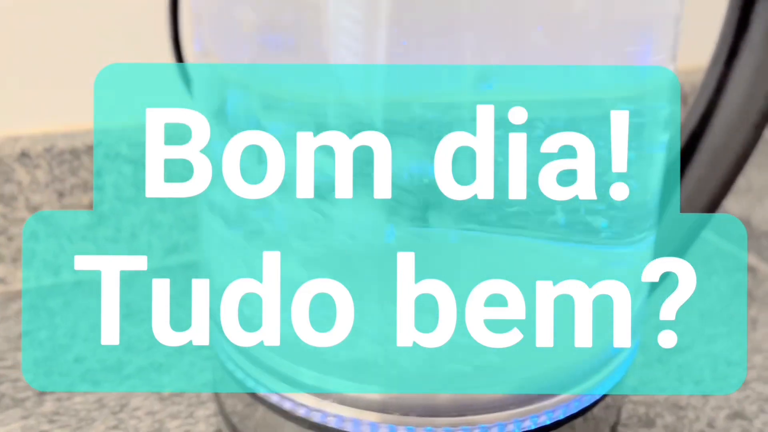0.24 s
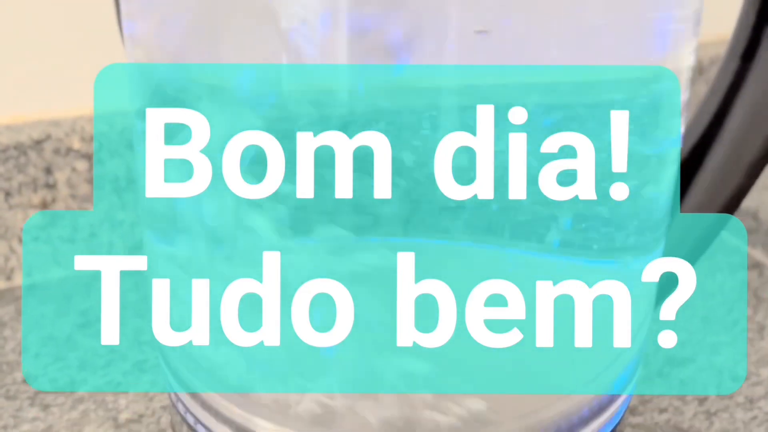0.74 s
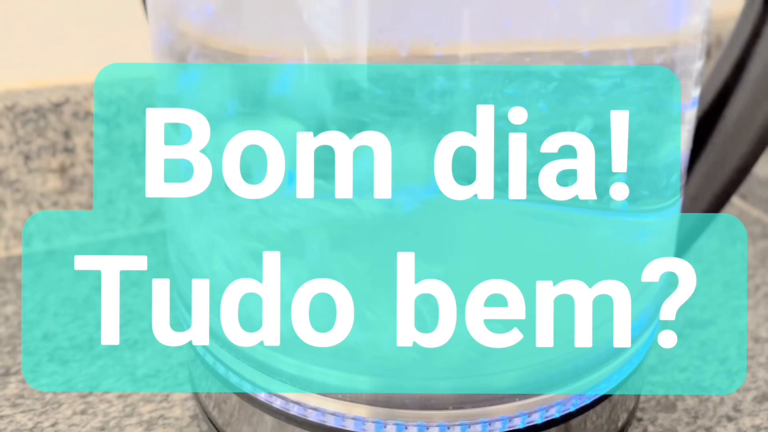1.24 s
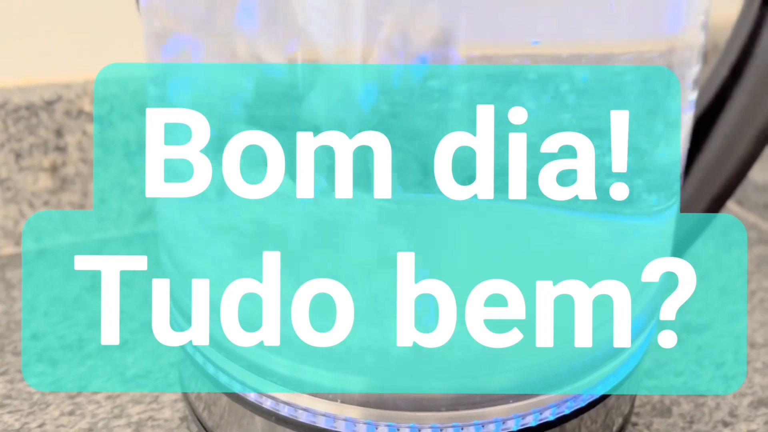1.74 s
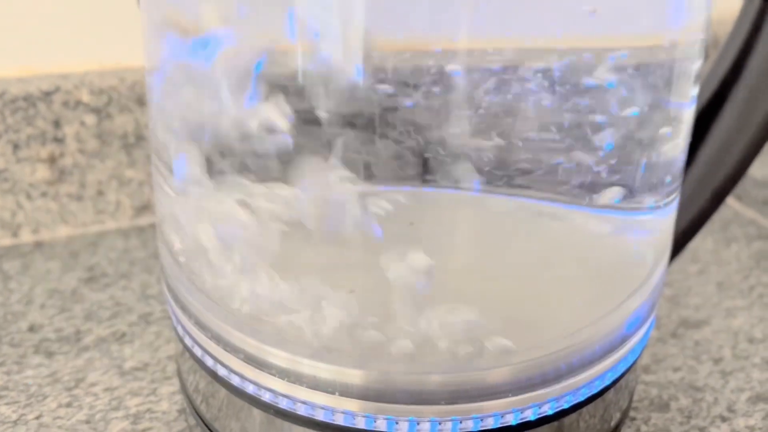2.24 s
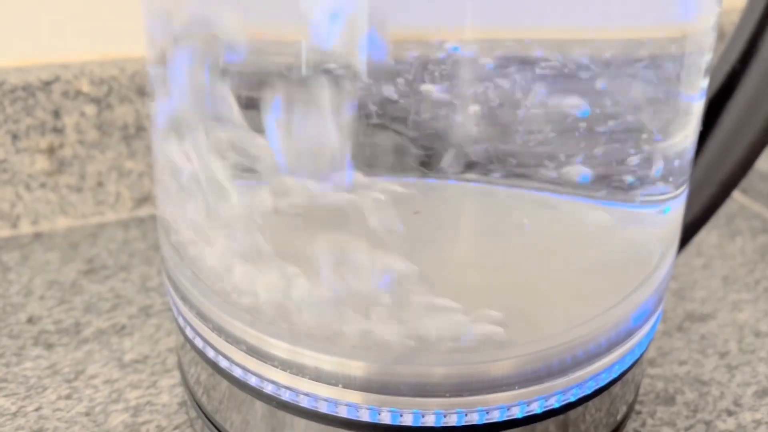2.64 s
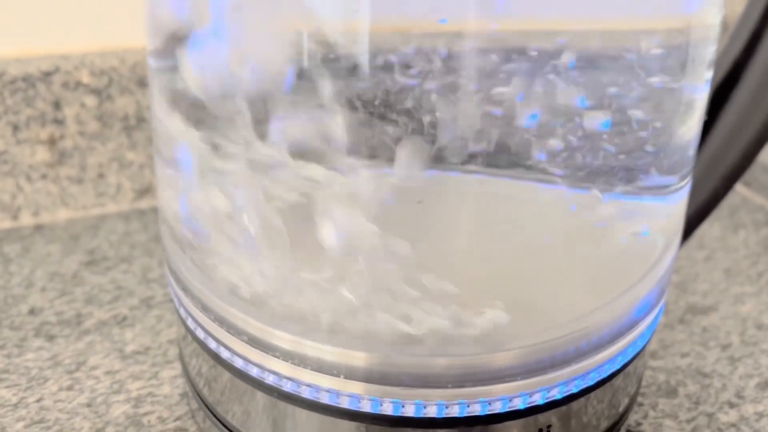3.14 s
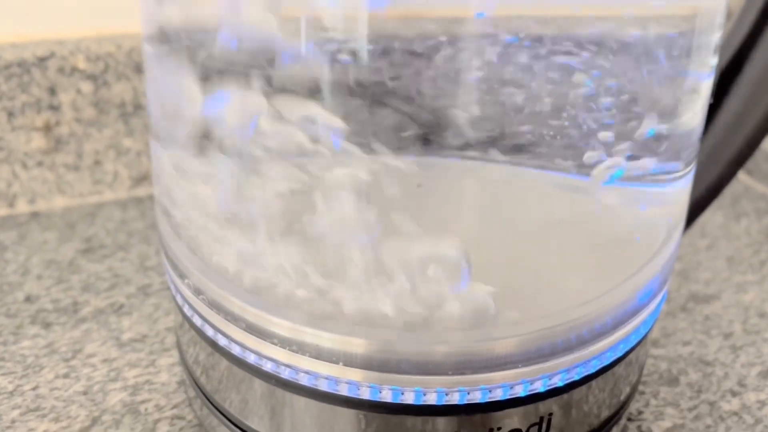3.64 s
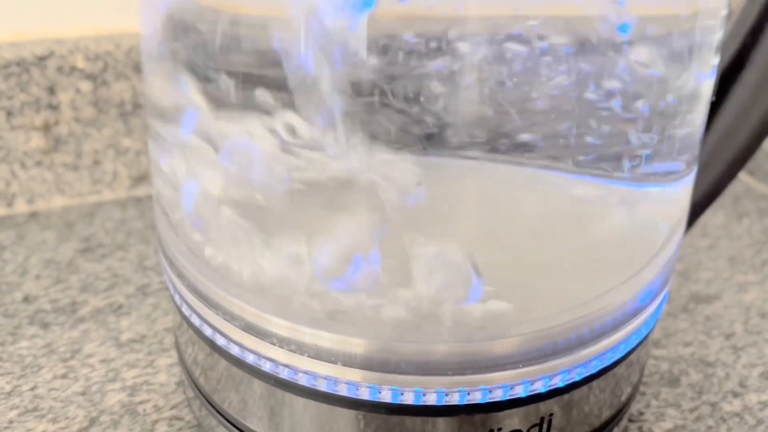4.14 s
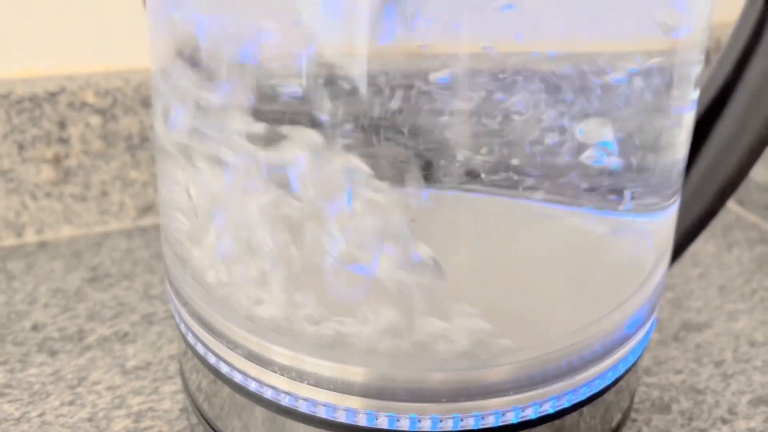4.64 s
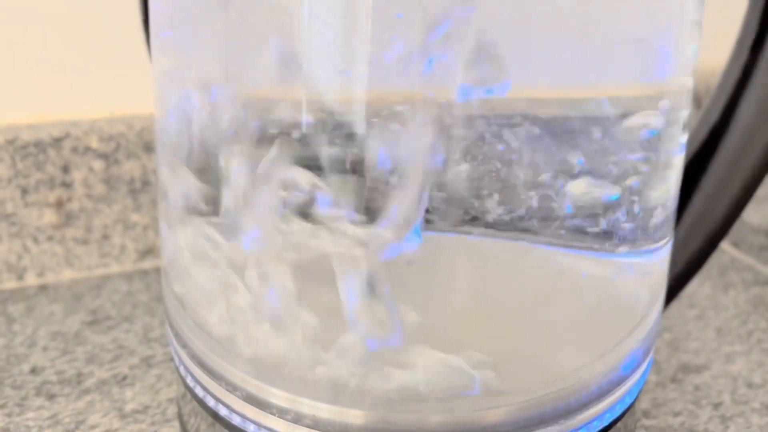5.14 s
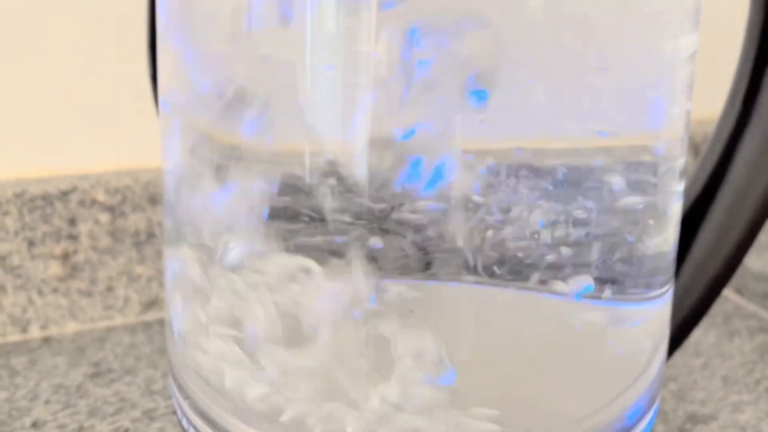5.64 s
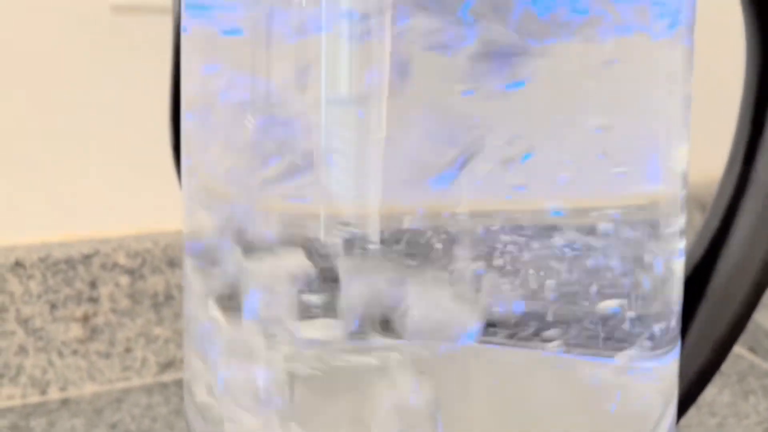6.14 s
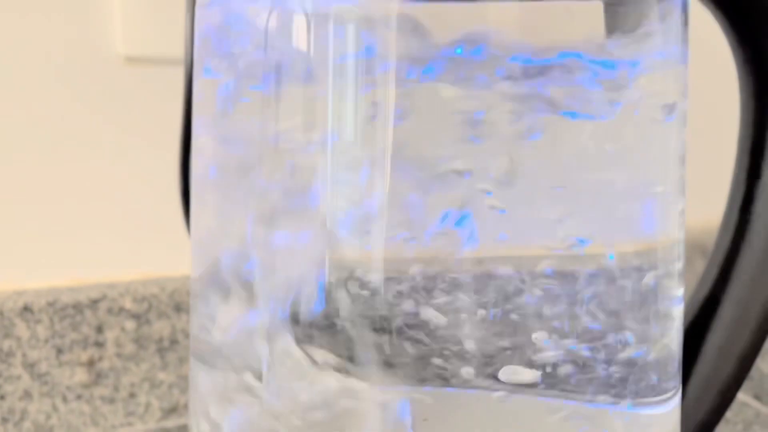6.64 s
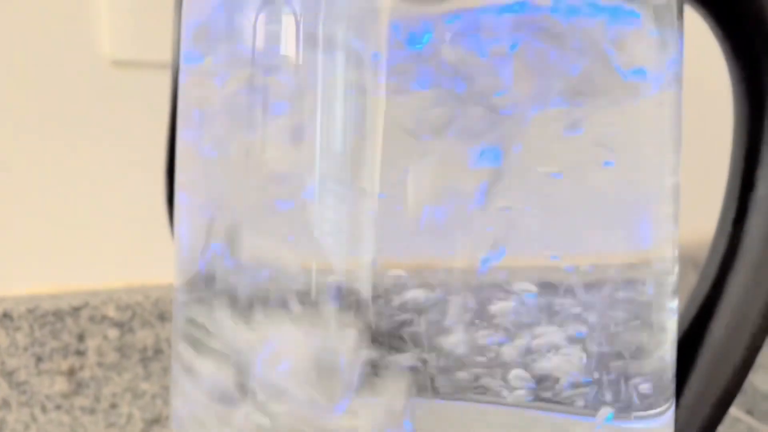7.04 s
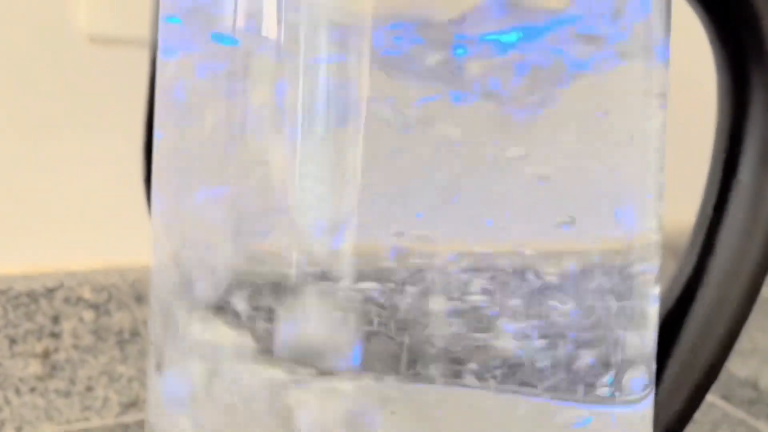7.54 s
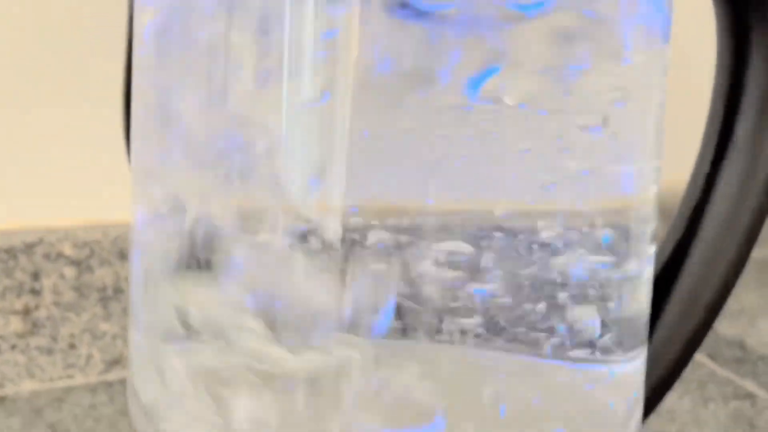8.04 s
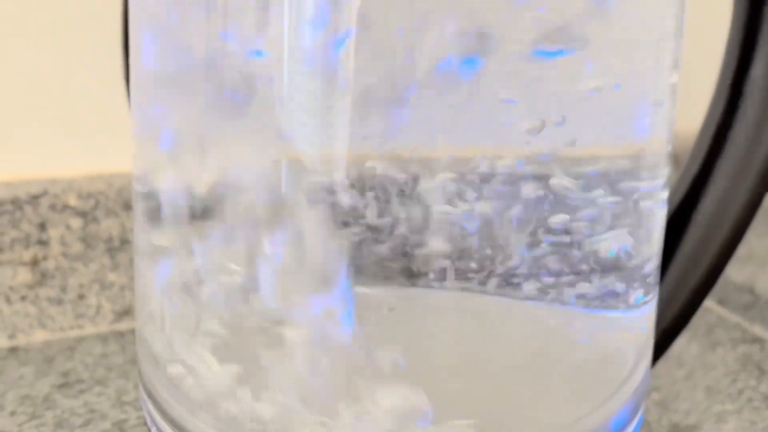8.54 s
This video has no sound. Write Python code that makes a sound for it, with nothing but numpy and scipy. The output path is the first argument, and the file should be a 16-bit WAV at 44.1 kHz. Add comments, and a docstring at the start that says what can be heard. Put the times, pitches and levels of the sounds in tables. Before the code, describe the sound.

Continuous rolling boil in a glass jug, heard close in stereo in a kitchen. Dense bubble collapses make a resonant rumble and soft hiss; irregular larger bubbles gulp over them. Little drops pop and tick, more often later, as spray falls back in short gusts. The bass eases a little and the top becomes splashier. Hard walls give a diffuse spread, with a barely audible high appliance whine behind.

```python
"""Glass kettle at a rolling boil

A glass kettle boils on a stone worktop, heard close by a mid-side pair of microphones.
Steam bubbles collapse on the heating plate: clumped clicks drive the jug's resonances as roar and fizz.
A low boom is narrow-band noise whose level beats by chance, its stronger moments placed by a table as a
tone of wandering pitch. Bubbles gulp as short rising sines, droplets pop as plinks with noisy edges, and
spray falls back as noise bursts. The walls return a blurred share of the collapses at the sides, and a
faint motor whine of steady sines comes from elsewhere in the kitchen."""
import sys
import numpy as np
from scipy import signal
from scipy.fft import rfft, irfft, next_fast_len
from scipy.io import wavfile

SR = 44100
rng = np.random.default_rng(int(sys.argv[2]) if len(sys.argv) > 2 else 0)


def master(y):
    """Save y as 16-bit WAV."""
    cut = np.clip(np.atleast_2d(y).T, -1, 1)
    pcm = np.round(cut * 32767)  # scale
    wavfile.write(sys.argv[1], SR, pcm.astype(np.int16))


N = 387631   # length in samples
SIZE = next_fast_len(N + SR // 2)   # transform length, with room for filter tails
HZ = np.maximum(np.arange(SIZE // 2 + 1) * SR / SIZE, 1)   # frequency of every bin


def from_db(db):
    """Gain of a level in dB."""
    return 10 ** (np.asarray(db) / 20)


def rms_one(x):
    """Scale to rms 1."""
    return x / np.sqrt(np.mean(x ** 2) + 1e-20)


def add(out, start_s, sound):
    """Mix a short sound in at a given time."""
    i = round(start_s * SR)
    out[i:i + len(sound)] += sound[:N - i]


def drift(rate):
    """Slow random curve with spread 1, changing about rate times a second."""
    step = 40   # samples between the points of the curve
    pole = np.exp(-2 * np.pi * rate * step / SR)
    noise = rng.standard_normal(N // step + 2002)
    slow = signal.lfilter([1], [1, -2 * pole, pole * pole], noise)[2000:]   # skip the settling
    return np.interp(np.arange(N) / step, np.arange(len(slow)), rms_one(slow))


def trend(start_db, db_per_s):
    """A level in dB that moves steadily."""
    return start_db + db_per_s * np.arange(N) / SR


def bump(centre_s, half_s):
    """A bell of height 1 around a given time."""
    return np.exp(-.5 * ((np.arange(N) / SR - centre_s) / half_s) ** 2)


def over_hz(points):
    """A spectrum table read at every bin, straight between points on a log frequency axis."""
    hz, value = np.transpose(points)
    return np.interp(np.log(HZ), np.log(hz), value)


def rises(modes):
    """Bell-shaped lift (or dip) in dB around each resonance."""
    return sum(db / (1 + (2 * (HZ - hz) / width) ** 2) for hz, width, db in modes)


def colour(x, gain_db):
    """Causal (minimum-phase) filter with the given dB at every bin."""
    cepstrum = irfft(gain_db * np.log(10) / 20, SIZE)
    # folding the cepstrum forward in time makes the response causal
    cepstrum[1:SIZE // 2] *= 2
    cepstrum[SIZE // 2 + 1:] = 0
    return irfft(rfft(x, SIZE) * np.exp(rfft(cepstrum)), SIZE)[..., :N]


def bandpass(x, order, low_hz, high_hz):
    """Butterworth band."""
    return signal.sosfilt(signal.butter(order, [low_hz, high_hz], "band", fs=SR, output="sos"), x)


def collapses(per_s, spread_db, clump_db, hiss_db):
    """Random clicks of uneven size that come in clumps, over the blur of countless small ones."""
    signs = rng.choice([-1, 1], N)
    sizes = from_db(spread_db * np.minimum(rng.exponential(1, N), 3.5)) * signs
    born = rng.random(N) < per_s / SR
    clump = from_db(clump_db * (drift(9.2) + drift(41)))
    clicks = rms_one(sizes * born * clump)
    return rms_one(clicks + from_db(hiss_db) * rng.standard_normal(N))


# Resonances of jug, water and lid: centre_hz, width_hz, rise_db
JUG_MODES = [(104.3, 13, 6.5), (200, 28, 7), (247.4, 16.4, 7.5), (339.6, 24, 7), (557, 42.4, 7.5),
             (693, 84, 7), (904, 23, 3.5), (1036, 24, 4), (1111, 22, 8.5), (1146, 16, 5.5), (1262, 25, 5),
             (1521, 160, 10.5), (1562, 12, 4.5), (1700, 100, -6.5), (1790, 59, 8), (2008, 40, 6.5),
             (2290, 140, 4.5), (2404, 30, 6), (2935, 40, 6.5), (2986, 150, 5), (3237, 36, 8.5),
             (3620, 250, -2.5), (4165, 380, 6.5), (7490, 370, 5)]


def jug():
    """Lift in dB that the resonances of jug, water and lid give to a sound passing through them."""
    return rises(JUG_MODES)


def pitch_wander():
    """Reading positions a little fast or slow: roar and wall sound wander slightly in pitch together."""
    stray = 0.003 * drift(rate=2.5)   # spread of the wander, as a share of the pitch
    return np.arange(N) + np.cumsum(stray - stray.mean())


def patchy(x, edges_hz, patch_db, rate):
    """Each band surges and sags on its own, as streams of bubbles of one size come and go."""
    spectrum, out = rfft(x, SIZE), x.copy()
    even_power_db = np.log(10) / 20 * patch_db ** 2   # holds the mean power of a band where it was
    for low, high in zip(edges_hz, edges_hz[1:]):
        bell = 1 / (1 + ((HZ ** 2 - low * high) / (HZ * (high - low))) ** 4)
        band = irfft(spectrum * bell, SIZE)[:N]
        out += band * (from_db(patch_db * drift(rate) - even_power_db) - 1)
    return out


# Roar spectrum before the jug, relative: pitch_hz, level_db (per Hz)
ROAR_SPECTRUM = [(30, -34.5), (50, -30), (70, -10), (130, -6), (220, -10), (420, -10), (620, -9.5),
                 (850, -15), (1400, -24), (1700, -28.5), (2600, -37), (5000, -52)]


def rumble(plate, positions):
    """Collapses on the plate drive the jug into a patchy roar whose lows thin as the boil ripens."""
    roar = rms_one(colour(plate, over_hz(ROAR_SPECTRUM) + jug()))
    roar = np.interp(positions, np.arange(N), roar)
    roar = patchy(roar, np.geomspace(450, 3600, 10), patch_db=1.07, rate=15.5)
    deep_band = 1 / (1 + (HZ / 440) ** 6) / (1 + (190 / HZ) ** 6)
    deep = irfft(rfft(roar, SIZE) * deep_band, SIZE)[:N]
    deep_gain = from_db(trend(start_db=-33, db_per_s=-0.71))
    rest_gain = from_db(trend(start_db=-37, db_per_s=0.074))
    return deep_gain * deep + rest_gain * (roar - deep)


# Fizz spectrum before the jug, relative: pitch_hz, level_db (per Hz)
FIZZ_SPECTRUM = [(800, -15), (2000, 2.5), (3500, -3.5), (5000, -2), (6500, -6), (8500, -8.5), (11500, -16),
                 (13500, -35)]


def fizz():
    """Finer, denser collapses sizzle through the jug, growing slowly."""
    fine = collapses(per_s=5400, spread_db=9.0, clump_db=0.5, hiss_db=2.5)
    gain = from_db(trend(start_db=-60.5, db_per_s=0.12))
    return gain * rms_one(colour(fine, over_hz(FIZZ_SPECTRUM) + jug()))


# The two neighbouring low bands of the boom: centre_hz, width_hz, level_db (relative)
BOOM_BANDS = [(153.94, 18, -0.5), (171.05, 12.2, 1.5)]
# Stronger moments of the boom: start_s, length_s (both before the overhang), level_db (before CREST_DB)
STRONG_MOMENTS = [(0.004, 0.034, -24), (0.242, 0.043, -36), (0.291, 0.055, -28), (0.404, 0.034, -24.5),
                  (0.498, 0.094, -29.5), (0.597, 0.046, -24.5), (0.702, 0.035, -29), (0.747, 0.058, -25.5),
                  (0.909, 0.095, -30.5), (0.963, 0.11, -29), (1.197, 0.034, -29), (1.255, 0.034, -27),
                  (1.335, 0.12, -27), (1.484, 0.053, -26.5), (1.563, 0.11, -27), (1.788, 0.04, -28),
                  (1.868, 0.17, -28), (2.016, 0.048, -28), (2.122, 0.053, -29), (2.304, 0.057, -25.5),
                  (2.383, 0.17, -26), (2.61, 0.058, -29.5), (2.71, 0.05, -28), (2.832, 0.04, -28.5),
                  (2.966, 0.026, -25.5), (3.008, 0.037, -24), (3.098, 0.046, -28.5), (3.172, 0.04, -25.5),
                  (3.215, 0.05, -22.5), (3.3, 0.024, -23), (3.434, 0.057, -27), (3.665, 0.13, -27),
                  (3.814, 0.017, -29), (4.279, 0.083, -24.5), (4.417, 0.031, -29), (4.628, 0.025, -28.5),
                  (4.797, 0.053, -26.5), (5.052, 0.067, -26), (5.414, 0.052, -25.5), (5.483, 0.041, -27),
                  (5.555, 0.081, -29.5), (5.827, 0.033, -29), (5.885, 0.036, -27), (5.974, 0.072, -28.5),
                  (6.044, 0.035, -26), (6.194, 0.041, -27.5), (6.338, 0.058, -27.5), (6.694, 0.025, -27),
                  (6.757, 0.048, -28), (6.98, 0.053, -23), (7.138, 0.034, -28.5), (7.195, 0.09, -27.5),
                  (7.325, 0.097, -29), (7.418, 0.03, -27), (7.47, 0.027, -25.5), (7.521, 0.032, -28),
                  (7.66, 0.062, -28.5), (7.743, 0.036, -28.5), (7.818, 0.083, -26.5), (8, 0.028, -25),
                  (8.047, 0.047, -28), (8.14, 0.042, -25.5), (8.288, 0.03, -25.5), (8.53, 0.066, -31)]
CREST_DB, OVERHANG_S = -1, 0.0072   # crest over a moment's level; extra time at either end


def boom():
    """Narrow-band noise beats by chance; a table places its stronger moments as a tone of random pitch."""
    sharp = sum(from_db(db) / (1 + (2 * (HZ - hz) / width) ** 4) for hz, width, db in BOOM_BANDS)
    noise = rms_one(irfft(rfft(rng.standard_normal(SIZE)) * sharp, SIZE))[:N]
    low, high = BOOM_BANDS[0][0], BOOM_BANDS[1][0]
    # the pitch wanders at random between the two band centres
    pitch_hz = (low + high) / 2 + 0.5 * (high - low) * np.tanh(drift(rate=9.03))
    tone = np.sqrt(2) * np.sin(2 * np.pi * np.cumsum(pitch_hz) / SR)
    tone_share, tone_level = np.zeros(N), np.zeros(N)
    for start_s, length_s, db in STRONG_MOMENTS:
        start = max(start_s - OVERHANG_S, 0)
        end = start_s + length_s + OVERHANG_S
        arch = np.hanning(round((end - start) * SR)) ** 0.65
        add(tone_share, start, arch)
        add(tone_level, start, arch * from_db(db + CREST_DB))
    noise_gain = from_db(trend(start_db=-33.5, db_per_s=-0.24))
    noise_gain = noise_gain * (1 - 0.66 * np.minimum(tone_share, 1))   # noise makes room for the tone
    return noise_gain * noise + tone_level * tone


# Loudest bubbles: start_s, level_db (before onset and decay), pitch_hz (at the start of the rise)
LOUD_GULPS = [(0.137, -28, 557), (0.401, -24, 530), (0.575, -39, 563), (0.66, -32.5, 574),
              (0.944, -26, 557), (1.036, -31, 660), (1.593, -33, 700), (1.634, -27.5, 534),
              (1.884, -32, 646), (2.02, -31, 700), (2.058, -32, 514), (2.252, -28.5, 530),
              (2.411, -32.5, 666), (2.841, -30, 710), (2.919, -31, 578), (3.036, -32, 615),
              (3.228, -32, 525), (3.287, -27, 540), (3.573, -34, 583), (3.831, -27, 650), (3.966, -27, 650),
              (4.006, -27, 573), (4.039, -30, 650), (4.151, -26, 556), (4.286, -34, 650),
              (4.567, -27.5, 545), (4.601, -30, 670), (4.733, -31, 545), (4.888, -26, 630),
              (5.295, -31, 640), (5.343, -31, 700), (5.417, -30, 556), (5.714, -29, 767), (5.809, -35, 700),
              (5.865, -33, 670), (5.902, -33, 650), (6.35, -29, 530), (6.537, -35, 574), (7.486, -32, 720),
              (7.515, -30, 560), (7.62, -42, 557), (7.646, -30, 530), (8.008, -30, 795), (8.086, -34, 540),
              (8.124, -26.5, 655), (8.151, -28, 686), (8.365, -28.5, 530), (8.421, -35, 563),
              (8.511, -30, 524), (8.763, -27, 586)]
KNOCK_DB, KNOCK_S = -15, 0.0053   # jolt of the jug under each loud bubble, before its band; decay


def small_gulps(per_s, level_db):
    """Small bubbles rise at random in flocks, a few much larger than the rest."""
    flock_db = 4.0 * drift(rate=16)
    draws = rng.random((round(per_s * N / SR), 3))
    bubbles = []
    for when, pitch, size in draws:
        size_db = -3.0 * np.log(size + 0.039)
        db = level_db + flock_db[int(when * N)] + size_db
        bubbles.append((when * N / SR, db, 450 * 8 ** pitch))
    return bubbles


def gulp(level_db, hz, cycles, rise):
    """A bubble rings a few cycles, its pitch rising as it nears the surface."""
    turns = np.arange(round(4 * cycles * SR / hz)) * hz / SR
    shape = (1 - np.exp(-turns / 0.14)) * np.exp(-turns / cycles)
    return from_db(level_db) * shape * np.sin(2 * np.pi * turns * (1 + rise * turns / cycles))


def gulps(small_per_s, small_db, cycles, rise):
    """Loud bubbles gulp in the open and jolt the jug; small ones are heard through the jug."""
    loud, faint, jolt = np.zeros(N), np.zeros(N), np.zeros(N)
    fading = np.exp(-np.arange(1500) / (KNOCK_S * SR))
    for start_s, db, hz in LOUD_GULPS:
        add(loud, start_s, gulp(db, hz, cycles, rise))
        add(jolt, start_s, from_db(db + KNOCK_DB) * fading * rng.standard_normal(1500))
    for start_s, db, hz in small_gulps(small_per_s, small_db):
        # the higher the pitch, the more cycles and the weaker the ring
        more_cycles = cycles * (hz / 600) ** 0.68
        weaker_db = db - 6.0 * np.log2(hz / 600)
        add(faint, start_s, gulp(weaker_db, hz, more_cycles, rise=0.015))
    jolt = bandpass(jolt, 2, 800, 2400)
    return loud + colour(faint + jolt, jug())


def splash_bursts(per_s, spread_db, decay_s, shared):
    """Noise bursts in six bands that start fast and die away; one noise for the front, one for the walls."""
    edges_hz, out = np.geomspace(1500, 15600, 7), 0
    fall = np.exp(-1 / (decay_s * SR))
    onset_and_decay = np.convolve([1, -fall], [1, -fall ** 12])
    busy = from_db(1.4 * drift(8))
    everywhere = rng.random(N) < shared * per_s * busy / SR   # these sound in all bands at once
    size = from_db(spread_db * np.minimum(rng.exponential(1, N), 3))
    for low, high in zip(edges_hz, edges_hz[1:]):
        here = rng.random(N) < (1 - shared) * per_s * busy / SR
        strength = size * (everywhere | here) * from_db(rng.normal(0, 0.73, N))
        burst = signal.lfilter([1], onset_and_decay, strength + 1e-18)
        out = out + bandpass(burst * rng.standard_normal((2, N)), 2, low, high)
    return out


# Spray spectrum on top of its bands, relative: pitch_hz, level_db
SPLASH_SPECTRUM = [(1500, -5), (2500, -3.5), (4000, 3), (6000, -0.5), (9000, -8), (12000, -9.5),
                   (14000, -9)]
# Gusts of spray: centre_s, rise_db
GUSTS = [(3.039, 3), (3.278, 6), (4.39, 6), (4.915, 9), (5.221, 6), (6.515, 7.5), (6.604, 8), (6.988, 8),
         (7.178, 2), (7.262, 3), (7.328, 8), (7.696, 7), (7.849, 6), (8.087, 5), (8.399, 5), (8.526, 6),
         (8.655, 2)]


def spray():
    """Spray falls back through the jug's resonances in gusts, growing as the boil ripens."""
    bursts = splash_bursts(per_s=340, spread_db=1.5, decay_s=0.0037, shared=0.18)
    gusts_db = sum(db * bump(s, half_s=0.011) for s, db in GUSTS)
    level_db = trend(start_db=-66.5, db_per_s=0.61) + 1.5 * drift(3.2) + gusts_db
    return from_db(level_db) * rms_one(colour(bursts, over_hz(SPLASH_SPECTRUM) + jug()))


def small_pops(per_s):
    """Small droplets pop at random, thicker as the boil ripens, around two ring pitches."""
    draws = rng.random((round(per_s * N / SR), 4))
    drops = []
    for when, loudness, which, detune in draws:
        hz = (4080 if which > .4 else 3000) * (1 + 0.24 * (detune - .5))
        drops.append((when ** 0.7 * N / SR, -52 + 6 * (loudness - .5), -17, hz))
    return drops


# Loudest droplet pops: start_s, level_db (of the plink before onset and decay),
# edge_db (over that level, before EDGE_LIFT_DB and its band), pitch_hz
LOUD_POPS = [(0.048, -43, -21, 4200), (0.215, -40, -24.5, 4150), (1.0355, -43, -20.5, 4130),
             (1.659, -41, -21, 4080), (1.5145, -42, -19, 3000), (1.7569, -42, -19, 4100),
             (2.1445, -43, -20, 4360), (3.0303, -37, -8, 4500), (4.178, -38.5, -23, 4270),
             (4.3355, -53, -4, 5600), (4.4706, -41, -20, 4200), (4.5745, -42, -14, 2920),
             (4.598, -41, -19.5, 4140), (4.611, -37.5, -26, 4070), (4.819, -40, -18.5, 4100),
             (4.9152, -42, -3, 4070), (4.9813, -38.5, -19, 4100), (5.1098, -45, -4, 4150),
             (5.1821, -39, -20.5, 4290), (5.679, -42, -22, 4100), (5.8042, -41, -12, 4210),
             (5.9988, -41.5, -17, 4120), (6.117, -42, -16, 4400), (6.276, -41, -15, 4070),
             (6.5021, -40, -24, 3080), (6.6089, -41, -18.5, 4330), (6.9446, -52, 0, 6000),
             (6.9775, -50, -1, 6000), (7.048, -40, -18, 4250), (7.168, -43, -18, 4170),
             (7.187, -42, -18, 4250), (7.229, -44, -16, 4190), (7.2583, -42, -12, 3600),
             (7.323, -44, -16, 5700), (7.4724, -46, -19, 3070), (7.496, -39.5, -24, 4000),
             (7.9154, -41, -11, 2900), (7.9818, -45, -15, 4040), (8.0765, -48, 0, 6000),
             (8.166, -35.5, -11, 4370), (8.496, -40, -11.5, 4080), (8.521, -37.5, -3, 4060),
             (8.598, -43, -16, 3100), (8.664, -41, -14.5, 4080)]
CRACKLE_DB, EDGE_LIFT_DB = -3, 0.5   # crackle over the plink, before its band; lift of every edge


def pops(decay_s, edge_s, ring_s):
    """Each droplet plinks at a pitch of its own, with a short crackle and a brighter edge."""
    plink, crackle, edge, t = np.zeros(N), np.zeros(N), np.zeros(N), np.arange(800) / SR
    ring_shape = (1 - np.exp(-t / 0.00083)) * np.exp(-t / ring_s)
    for start_s, db, edge_db, hz in LOUD_POPS + small_pops(per_s=25):
        crackle_noise, edge_noise = rng.standard_normal((2, 800))
        add(plink, start_s, from_db(db) * ring_shape * np.sin(2 * np.pi * hz * t))
        add(crackle, start_s, from_db(db + CRACKLE_DB) * crackle_noise * np.exp(-t / decay_s))
        add(edge, start_s, from_db(db + edge_db + EDGE_LIFT_DB) * edge_noise * np.exp(-t / edge_s))
    return plink + bandpass(crackle, 2, 2600, 6500) + bandpass(edge, 1, 6500, 11000)


# Difference between left and right: pitch_hz, left_over_right_db
LEFT_LEAN = [(60, -3), (130, 1.5), (280, 1), (600, -2), (1290, 3), (2780, -0.5), (5990, 6.5), (12900, 3)]
LEFT_LEAD_S = .000012   # how much earlier the middle sound reaches the left


def lean_left(mid):
    """A source left of centre leaks into the side signal, and reaches the left a little early."""
    level_lean = np.tanh(over_hz(LEFT_LEAN) * np.log(10) / 40)   # side over mid for that left over right
    time_lean = 1j * np.tan(np.minimum(np.pi * HZ * LEFT_LEAD_S, .25))
    return irfft(rfft(mid, SIZE) * (level_lean + time_lean), SIZE)[:N]


# Sound from the walls before their resonances, relative: pitch_hz, level_db (per Hz)
WALL_SPECTRUM = [(18, -51), (30, -37), (122, -4), (162, -10.5), (339, -2.5), (405, -16), (550, 0),
                 (871, -14.5), (1070, -9), (2180, -19), (2820, -16), (3280, -27), (10900, -38),
                 (13400, -33.5)]
# Resonances in the sound from the walls: centre_hz, width_hz, rise_db
WALL_MODES = [(206, 13, 12), (250, 25, 5), (282, 20, 4.5), (342, 25, 3.5), (698, 68, 9.5), (1079, 42, 13),
              (1180, 60, -20), (2720, 150, 4), (2870, 140, 10.5), (4260, 400, -1)]


def walls(plate, positions):
    """The walls return part of the same collapses and a blur of older ones."""
    older = collapses(per_s=3300, spread_db=5.5, clump_db=0.0, hiss_db=6.0)
    returned = colour(0.51 * plate + 0.94 * older, over_hz(WALL_SPECTRUM) + rises(WALL_MODES))
    return np.interp(positions, np.arange(N), from_db(-46.5) * rms_one(returned))


# Motor whine before its wavering: multiple (of WHINE_HZ), ahead_db, side_db
WHINE_TONES = [(16, -90, -74), (20, -90, -82), (42, -79, -92), (43, -85, -92), (48, -86, -90),
               (50, -79, -84), (51, -84, -92), (52, -76, -90), (53, -71, -90), (54, -83, -92),
               (55, -82, -90), (59, -87, -94)]
# Wavering of the whine: time_s, level_db
WHINE_LEVEL = [(0.0, -2.5), (2.9, 1), (5.58, 1), (6.36, -3.5), (7.3, -4.5), (8.79, 0)]
WHINE_HZ = 103.93   # rate of the motor


def whine(hiss_db):
    """Steady high multiples of a motor's rate, ahead and at the sides, with a band of hiss around them."""
    t = np.arange(N) / SR
    tones = 0
    for multiple, ahead_db, side_db in WHINE_TONES:
        sine = np.sqrt(2) * np.sin(2 * np.pi * (multiple * WHINE_HZ * t + rng.random()))
        tones = tones + from_db([[ahead_db], [side_db]]) * sine
    hiss = rms_one(bandpass(rng.standard_normal((2, N)), 2, 5080, 5600))
    time_s, level_db = np.transpose(WHINE_LEVEL)
    return from_db(np.interp(t, time_s, level_db)) * (tones + from_db(hiss_db) * hiss)


def scene():
    """The kettle ahead, a little to the left, and its sound returned from the walls at the sides."""
    plate = collapses(per_s=1500, spread_db=3.0, clump_db=0.7, hiss_db=1.5)
    positions = pitch_wander()
    spray_ahead, spray_sides = spray()
    whine_ahead, whine_sides = whine(hiss_db=-76)
    mid = rumble(plate, positions) + fizz() + boom()
    mid += gulps(small_per_s=320, small_db=-51.0, cycles=4.14, rise=0.0726)
    mid += spray_ahead + pops(decay_s=0.004, edge_s=0.003, ring_s=0.0019) + whine_ahead
    side = walls(plate, positions) + from_db(-2.5) * spray_sides + whine_sides + lean_left(mid)
    return np.array([mid + side, mid - side])


def record(dry):
    """The top is cut, lower in the middle than at the sides."""
    mid, side = (dry[0] + dry[1]) / 2, (dry[0] - dry[1]) / 2
    mid = signal.sosfilt(signal.cheby2(14, 50, 13550, fs=SR, output="sos"), mid)   # edge in Hz
    side = signal.sosfilt(signal.ellip(12, .5, 70, 15700, fs=SR, output="sos"), side)
    return np.array([mid + side, mid - side])


dry = scene()
out = record(dry)
master(out)
```